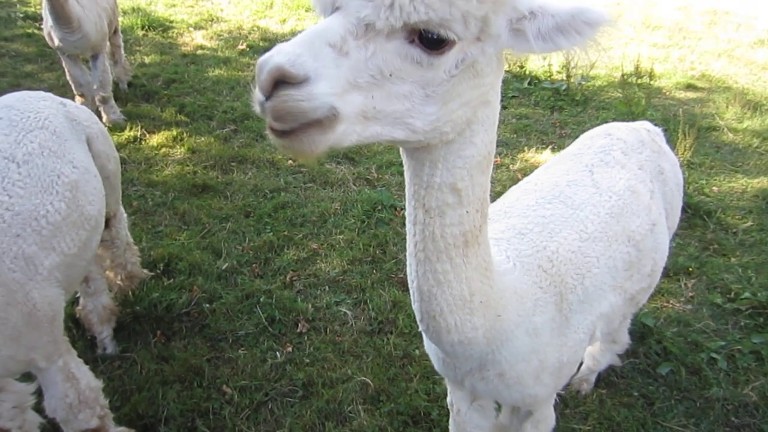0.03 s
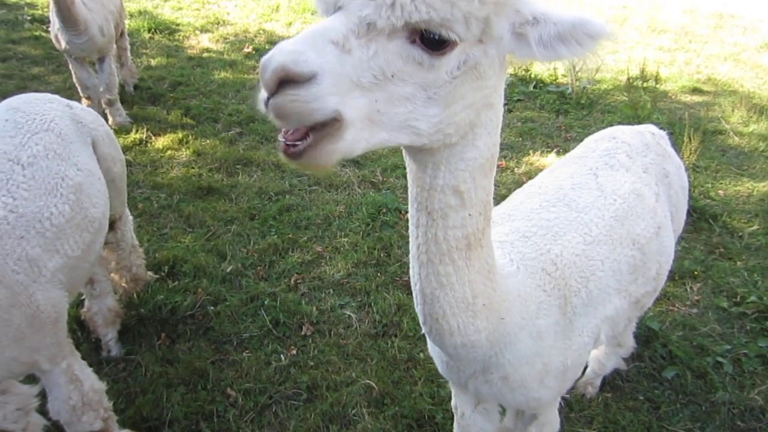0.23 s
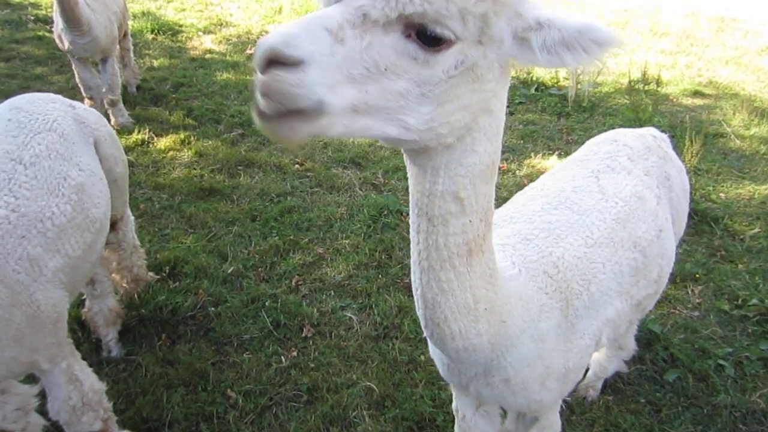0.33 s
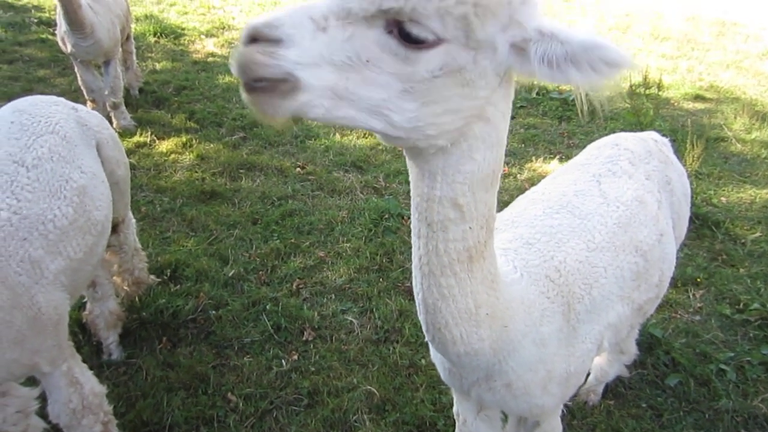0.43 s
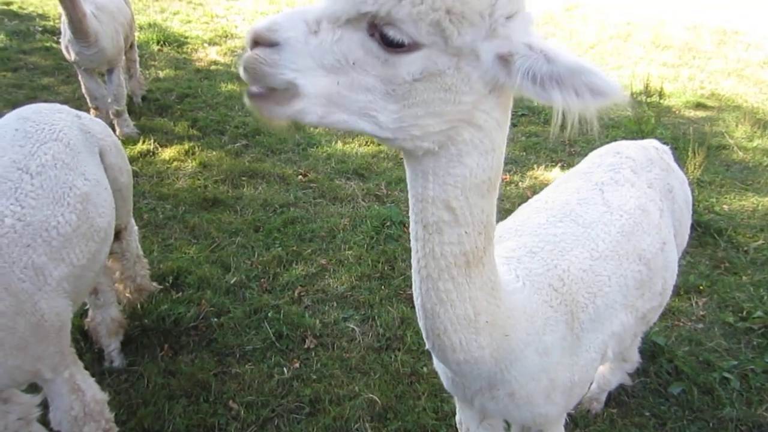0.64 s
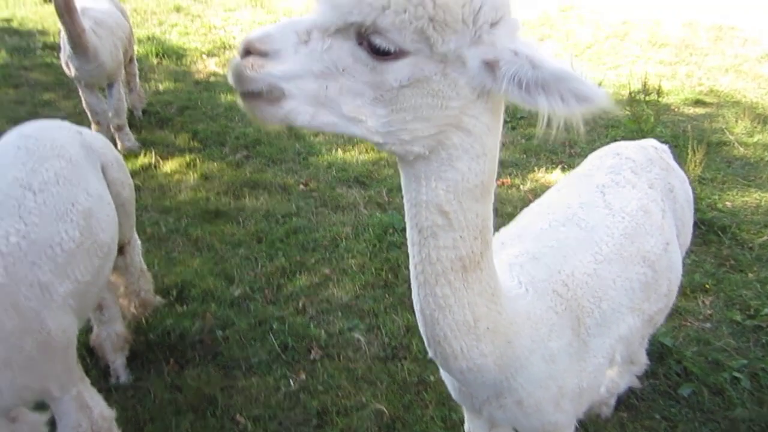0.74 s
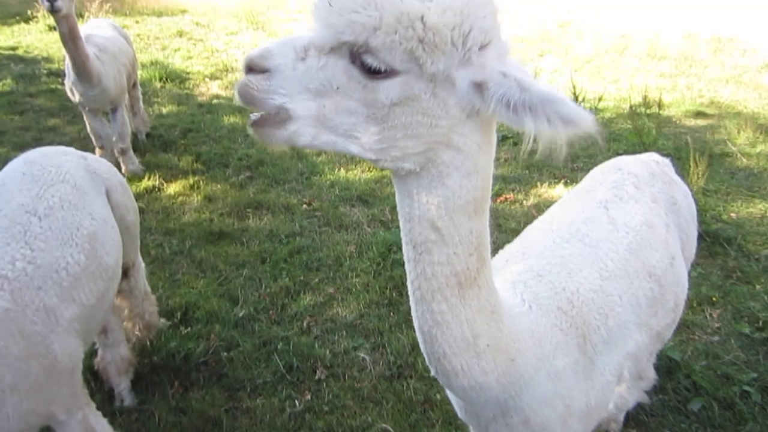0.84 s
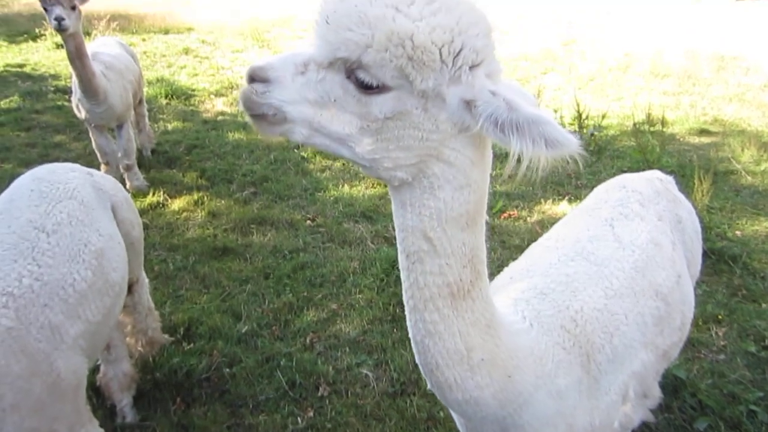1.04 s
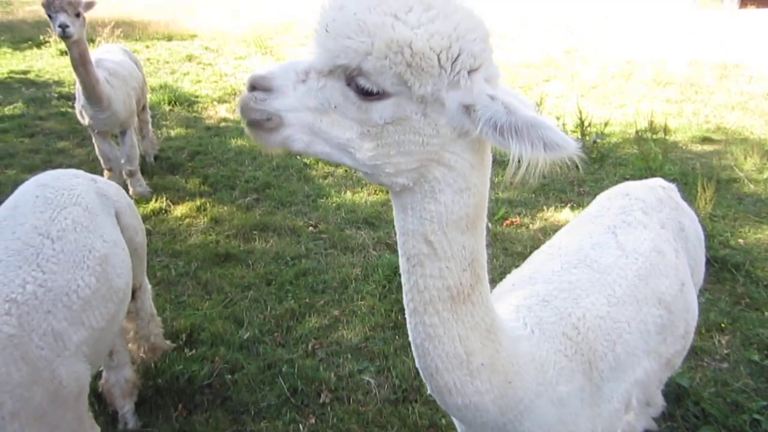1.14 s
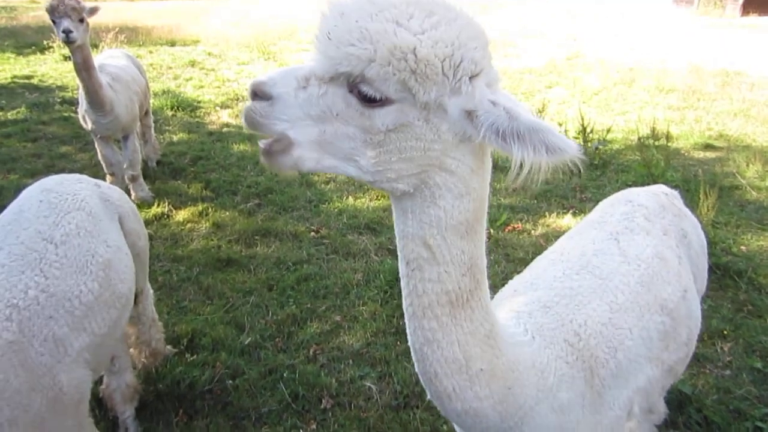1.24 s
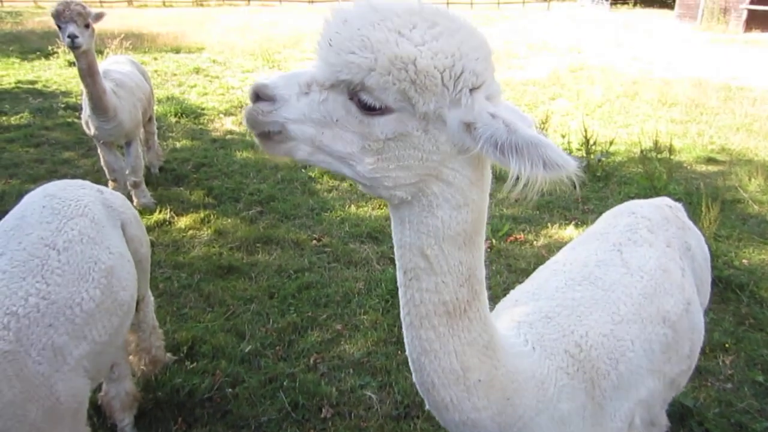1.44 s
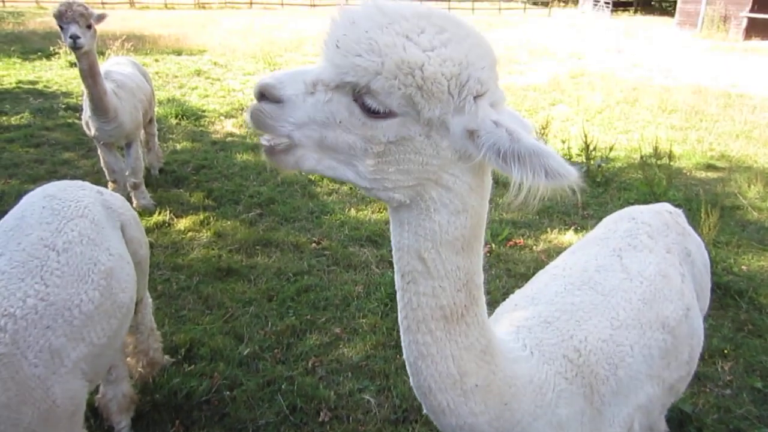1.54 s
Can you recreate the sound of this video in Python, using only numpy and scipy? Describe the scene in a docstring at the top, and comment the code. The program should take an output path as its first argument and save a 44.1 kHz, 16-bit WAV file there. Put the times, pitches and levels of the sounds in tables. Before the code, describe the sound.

Low puffs of air thump on the microphone beside an alpaca outdoors, peaking early in one violent pop that ducks the soft steady field rush; afterwards only lighter bumps and faint knocks remain.

```python
"""A breezy pasture with alpacas, close to the nearest animal, heard from a hand-held camera with two microphone ports.
Puffs of air buffet the ports in low thumps: swells of low noise, and single pressure swings for the hardest eddies.
The hardest, as the nearest animal jerks its head, pops and makes the limiter duck the steady rush of the field.
The rush is wide shaped noise; a few faint ticks and soft knocks from the animals are short bursts of band noise."""
import sys
import numpy as np
from scipy.fft import rfft, irfft, next_fast_len
from scipy.io import wavfile
from scipy.ndimage import map_coordinates

SR = 44100
rng = np.random.default_rng(int(sys.argv[2]) if len(sys.argv) > 2 else 0)


def dump(signal):
    """Clip the signal to [-1, 1] and save it as 16-bit WAV at the path in sys.argv[1]."""
    limited = np.clip(np.atleast_2d(signal).T, -1, 1)
    pcm = np.round(limited * 32767).astype(np.int16)
    wavfile.write(sys.argv[1], SR, pcm)


N = 70560  # samples, 1.6 s

# Levels of puffs, eddies, ticks and field are ahead of the limiter.
# Puffs of air on the ports: middle_s, half_length_s, level_db, left_over_right_db, upper_edge_hz
AIR_PUFFS = [(.004, 0.0073, -30.5, 2, 130), (0.037, 0.013, -36.5, -5, 93), (0.133, 0.06, -42, -2.5, 87),
             (0.215, 0.016, -23, 4, 260), (0.27, 0.017, -26, 3, 180), (0.285, 0.01, -19, -3, 290),
             (0.3158, 0.0059, -9, 1.5, 563), (.335, 0.0031, -14.5, 7, 340), (0.384, .015, -19, -2.5, 264),
             (0.42, 0.011, -32, 6, 170), (0.721, 0.0068, -27.5, -2.5, 162), (0.748, 0.0094, -24, -5, 248),
             (0.803, 0.0062, -36.5, -5, 174), (0.856, 0.015, -26.5, 4, 139),
             (0.98, 0.014, -29.5, -0.5, 150), (1.295, 0.0056, -26, 1.5, 211), (1.341, 0.0095, -34, 2, 136),
             (1.459, 0.016, -29, -2, 160)]
# Single hard eddies: middle_s, middle_to_zero_ms, peak_full_scales (suction negative), left_over_right_db
HARD_EDDIES = [(.201, 1.95, 0.43, -4.5), (.221, 1.7, 0.36, 6), (.283, 1.72, 0.69, -6.5),
               (0.3025, 0.85, -2, 6), (0.3055, 0.66, 1.5, 4.5), (0.312, 1.3, -0.04, 6),
               (.745, 0.91, -0.45, -4.5), (0.852, 1.9, 0.05, -4), (1.3077, 1.46, 0.31, -6),
               (1.459, 2.8, 0.05, -16)]
# Small noises of the animals: middle_s, half_length_s, level_db, centre_hz, width_octaves
ANIMAL_TICKS = [(0.026, 0.0016, -65.5, 7900, .25), (0.037, 0.00096, -63, 7940, 0.28),
                (0.384, .0005, -73, 4500, .6), (0.46, 0.0068, -66.5, 5520, 0.52),
                (0.714, 0.0026, -44.5, 617, 0.22), (1.446, 0.0041, -43.5, 283, 0.48)]
# Spectrum of the field's rush: frequency_hz, relative_density_db
FIELD_SPECTRUM = [(25, 1), (100, 0), (250, 0.5), (500, -1.5), (800, -4), (1300, -8), (2300, -13.5),
                  (3700, -22.5), (6000, -27), (8500, -33), (10500, -42), (12000, -56), (13500, -45.5),
                  (15500, -42.5)]
# Stereo width of the rush: frequency_hz, side_over_mid_db
FIELD_WIDTH = [(60, -8), (200, -2.5), (500, -2.5), (1300, -1), (4400, -1.5), (12000, 0)]
# Slow course of the rush: time_s, level_db
FIELD_COURSE = [(0, -47.5), (.3, -48.5), (.7, -48.5), (1, -47.5), (1.52, -48), (1.6, -46)]

CROSS_FEED = 0.54  # each port reaches the other channel upside down, at this gain
PUFF_LOW_HZ, PUFF_BODY_HZ = 55.6, 139  # lower edge, start of the gentle fall
PUFF_STEEPNESS = 5.04  # order of the upper edge
FLUTTER_DB, FLUTTER_SWING_DB, FLUTTER_TOP_HZ = -48.5, 1, 92  # light buffeting between the puffs
FIELD_PAN_DB, FIELD_SWING_DB = 2.5, 0.27  # left over right, size of the small level wander
CEILING, RELEASE_S = .99, 0.22  # the limiter's threshold in full scales and its recovery time
HISS_BURST_DB, HISS_BURST_HZ = -48, 3000  # treble noise: level per neper of gain reduction, lower edge
TOP_HZ = 15800  # band limit of the microphone signal


def amp(db):
    """Decibels to gain."""
    return 10 ** (np.asarray(db) / 20)


def unit(x):
    """Scale to rms 1."""
    return x / np.sqrt(np.mean(x ** 2) + 1e-20)


def along(points, hz):
    """Read (Hz, value) points on a log frequency axis."""
    f, v = np.transpose(points)
    return np.interp(np.log(hz + 1), np.log(f + 1), v)


def wobble(rate):
    """A random curve through rate knots a second, smoothed by a spline."""
    knots = rng.standard_normal(int(N * rate / SR) + 4)
    return map_coordinates(knots, [np.arange(N) * rate / SR])


def filtered(x, response):
    """Apply a gain that depends on frequency, with room for the ringing."""
    m = next_fast_len(N + SR // 4)
    spectrum = rfft(x, m) * response(np.fft.rfftfreq(m, 1 / SR))
    return irfft(spectrum, m)[..., :N]


def pan(db):
    """Left and right gains that differ by db."""
    return amp([[db / 2], [-db / 2]])


def burst(noise, middle_s, half_length_s):
    """Noise under a bell-shaped swell, about rms 1 at its top."""
    bell = np.exp(-.5 * ((np.arange(N) / SR - middle_s) / half_length_s) ** 2)
    return unit(noise * bell) * np.sqrt(np.mean(bell ** 2))


def turbulence(top_hz):
    """Low pressure noise on both ports, cross-fed so the two channels are largely opposite."""
    def response(f):
        lower_edge = f ** 2 / np.hypot(f ** 2, PUFF_LOW_HZ ** 2)
        gentle_fall = 1 / np.hypot(1, f / PUFF_BODY_HZ)
        upper_edge = 1 / np.hypot(1, (f / top_hz) ** PUFF_STEEPNESS)
        return lower_edge * gentle_fall * upper_edge

    ports = filtered(rng.standard_normal((2, N)), response)
    return unit(ports - CROSS_FEED * ports[::-1])


def puffs():
    """Air buffeting the ports: swells of turbulence over a light, continuous flutter."""
    flutter_db = FLUTTER_DB + FLUTTER_SWING_DB * wobble(4.6)
    out = amp(flutter_db) * turbulence(FLUTTER_TOP_HZ)
    for middle_s, half_length_s, level_db, left_over_right_db, upper_edge_hz in AIR_PUFFS:
        swell = burst(turbulence(upper_edge_hz), middle_s, half_length_s)
        out += amp(level_db) * pan(left_over_right_db) * swell
    return out


def eddies():
    """Each eddy is one smooth pressure swing, strongest in the channel of the port it hits."""
    out = np.zeros((2, N))
    for middle_s, width_ms, peak, left_over_right_db in HARD_EDDIES:
        u = (np.arange(N) / SR - middle_s) * 1000 / width_ms
        swing = (1 - u ** 2) * np.exp(-u ** 2 / 2)
        gains = pan(left_over_right_db)
        # the louder channel reaches the full peak; the right one is upside down
        out += peak * swing * gains / gains.max() * [[1], [-1]]
    return out


def ticks():
    """Brief ticks in the grass and soft knocks, straight ahead: short bursts of band noise."""
    out = np.zeros((2, N))
    for middle_s, half_length_s, level_db, centre_hz, width_octaves in ANIMAL_TICKS:
        def band(f):
            return np.exp(-.5 * (np.log2((f + 1) / centre_hz) / width_octaves) ** 2)

        noise = filtered(rng.standard_normal(N), band)
        out += amp(level_db) * burst(noise, middle_s, half_length_s)
    return out


def field():
    """Wide, steady rush of wind over grass and trees: shaped noise in mid and side."""
    def response(f):
        mid_db = along(FIELD_SPECTRUM, f)
        return amp([mid_db, mid_db + along(FIELD_WIDTH, f)])

    mid, side = filtered(rng.standard_normal((2, N)), response)
    rush = unit(np.array([mid + side, mid - side]))
    course_db = np.interp(np.arange(N) / SR, *np.transpose(FIELD_COURSE))
    level_db = course_db + FIELD_SWING_DB * wobble(11.54)
    return amp(level_db) * pan(FIELD_PAN_DB) * rush


def scene():
    """The air on the microphone over the animals and their field."""
    return puffs() + eddies() + ticks() + field()


def record(dry):
    """A linked limiter flattens the peaks and recovers slowly; treble noise is added, then the band is cut off."""
    excess = np.maximum(np.abs(dry).max(axis=0) / CEILING, 1)
    # the log gain reduction jumps up at once and decays exponentially
    fade = np.exp(-np.arange(N) / SR / RELEASE_S)
    held = np.maximum.accumulate(np.log(excess) / fade) * fade
    limited = dry * np.exp(-held)
    # short burst of treble noise while the gain reduction rises
    rising = held * (np.diff(held, prepend=0) > 0)
    treble = unit(filtered(rng.standard_normal((2, N)), lambda f: f / np.hypot(f, HISS_BURST_HZ)))
    hiss_burst = amp(HISS_BURST_DB) * rising * treble
    return filtered(limited + hiss_burst, lambda f: f < TOP_HZ)


dry = scene()
out = record(dry)
dump(out)
```